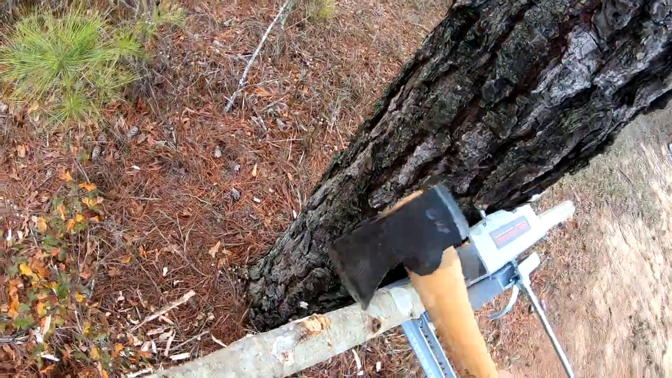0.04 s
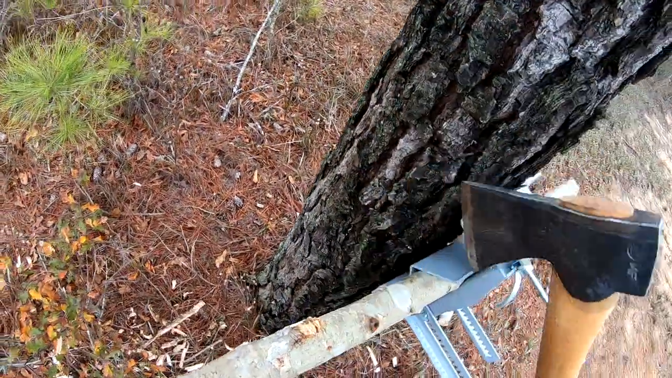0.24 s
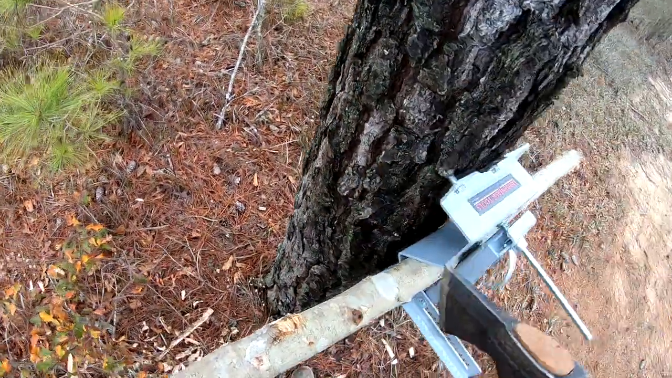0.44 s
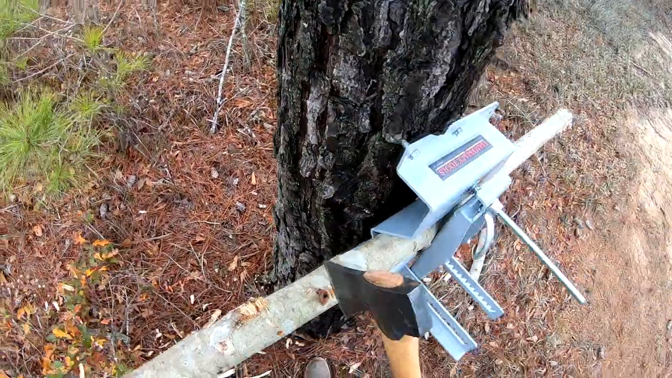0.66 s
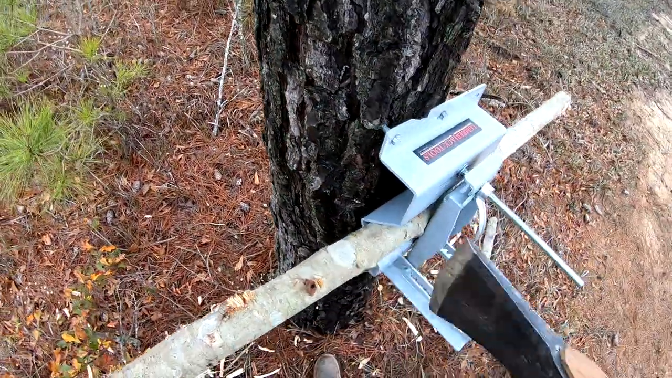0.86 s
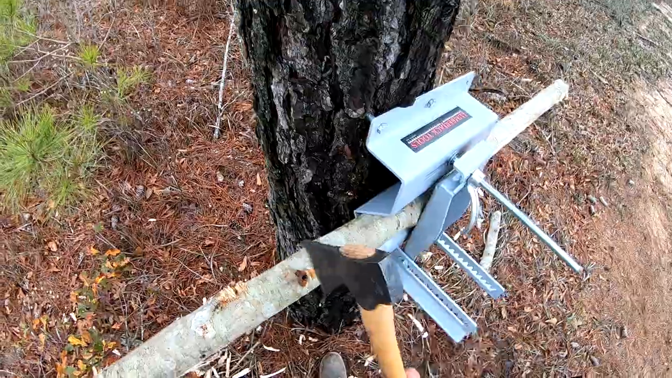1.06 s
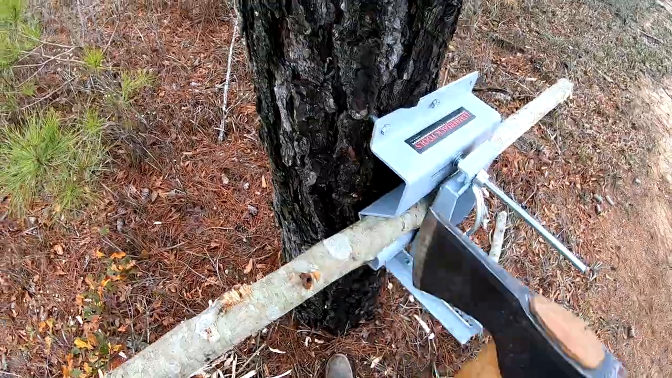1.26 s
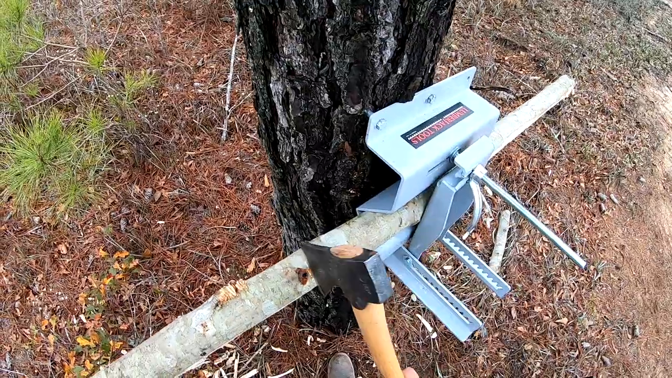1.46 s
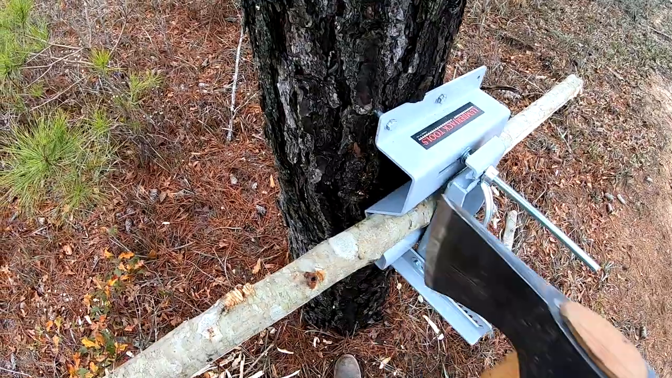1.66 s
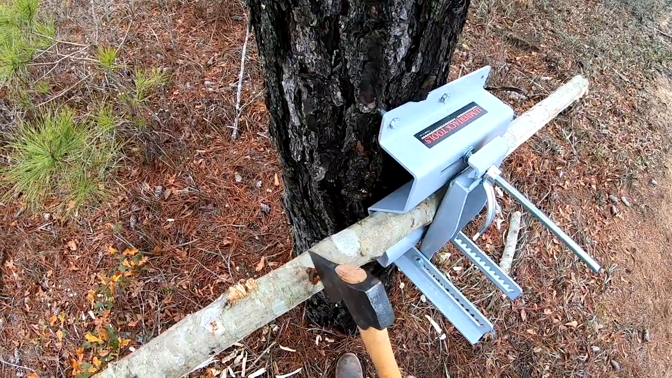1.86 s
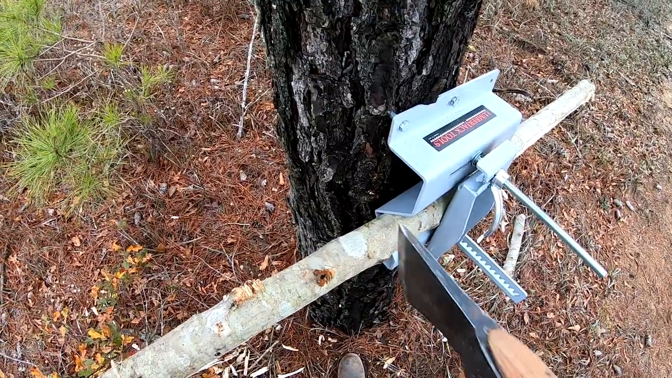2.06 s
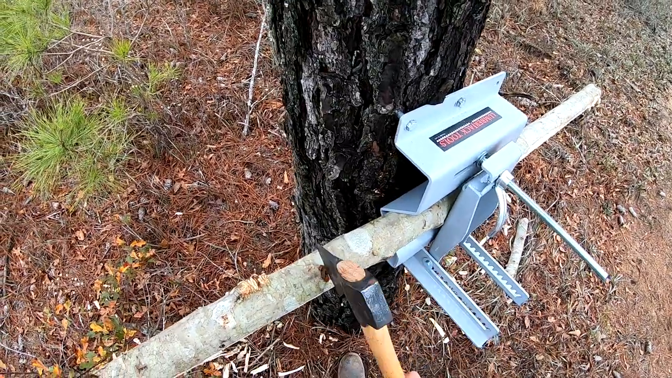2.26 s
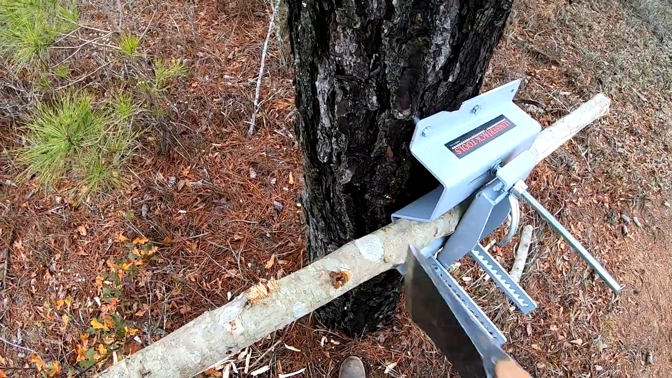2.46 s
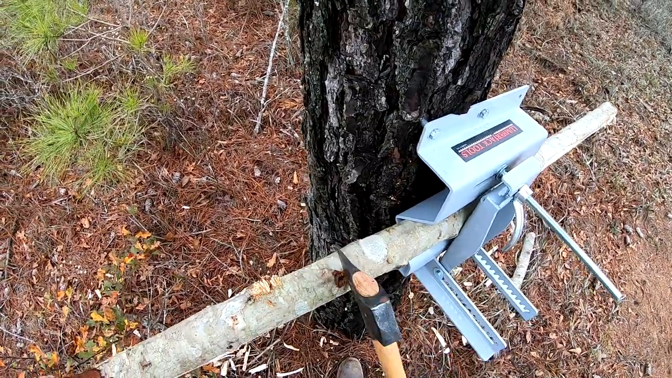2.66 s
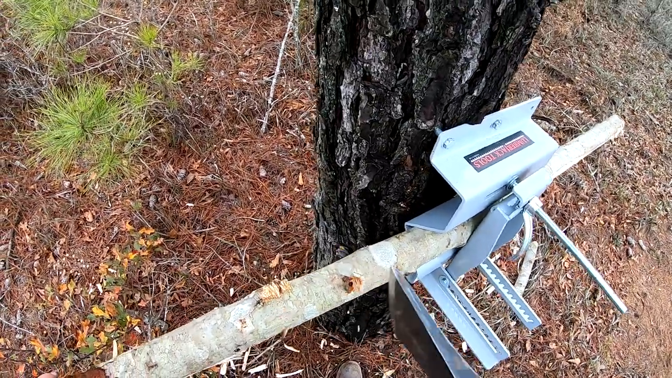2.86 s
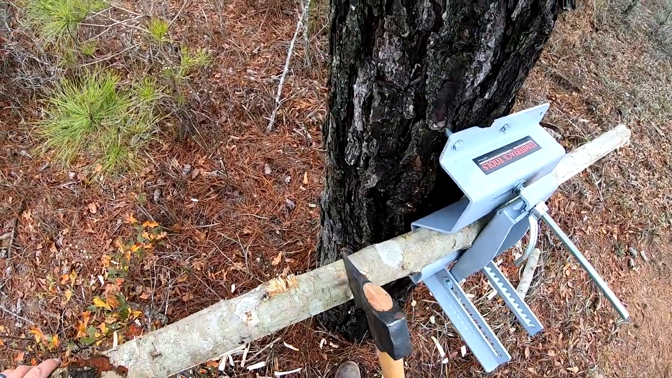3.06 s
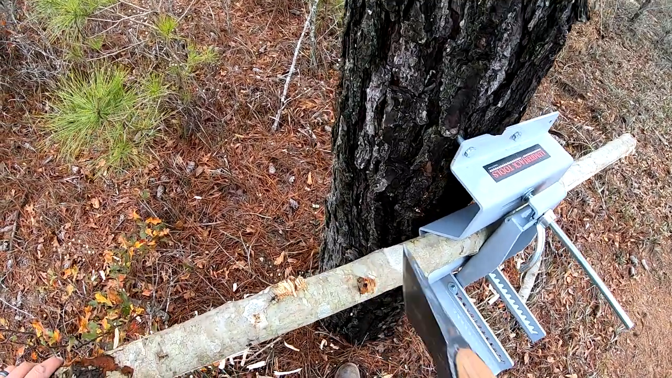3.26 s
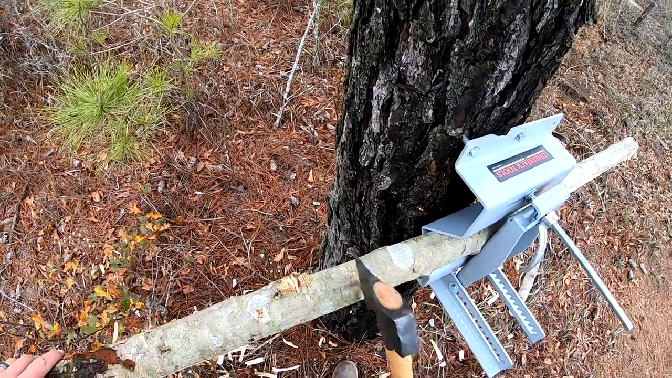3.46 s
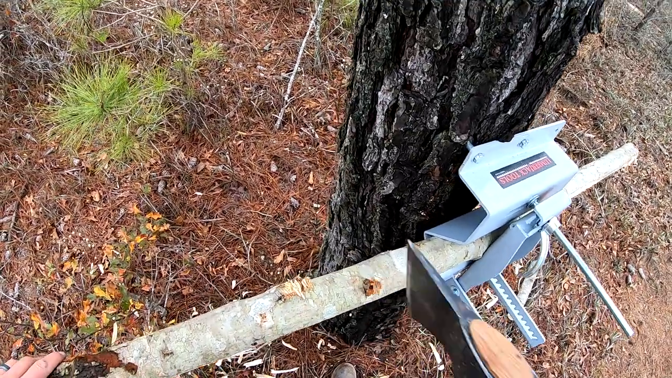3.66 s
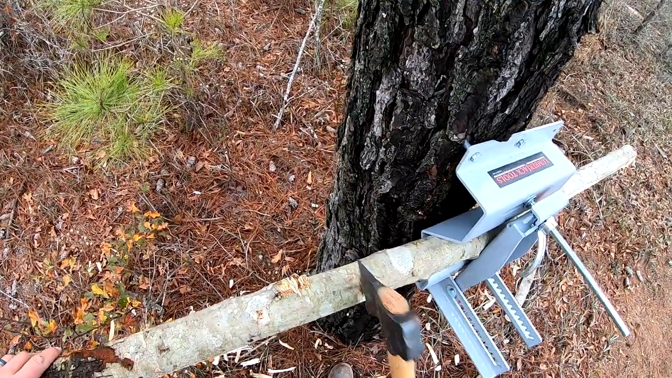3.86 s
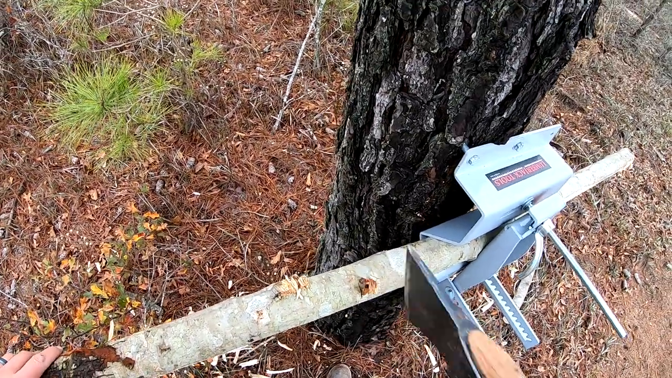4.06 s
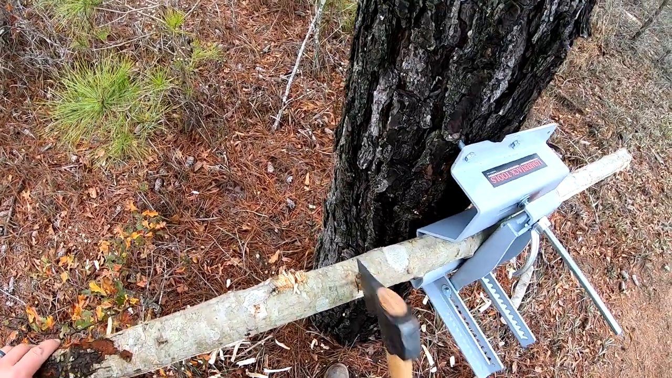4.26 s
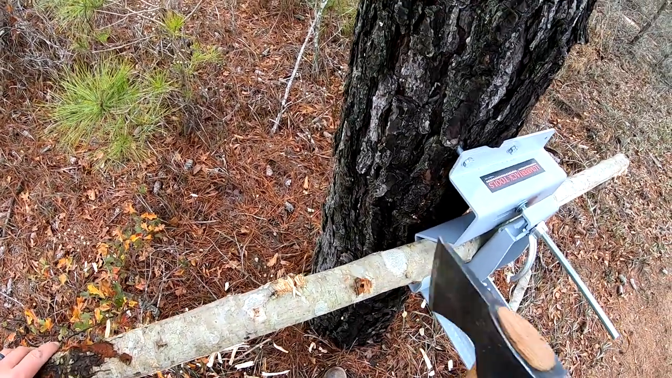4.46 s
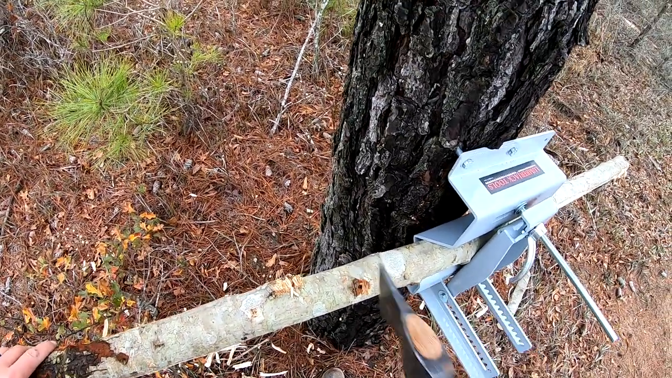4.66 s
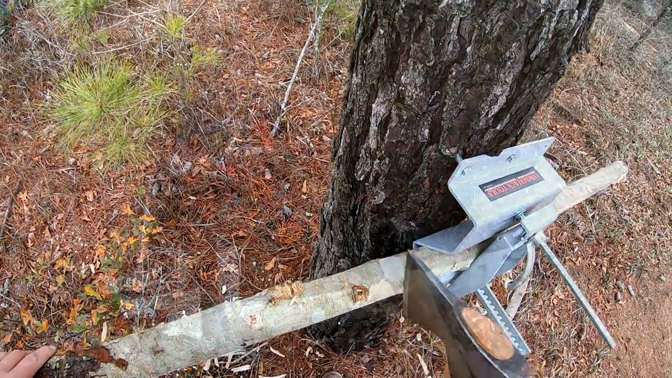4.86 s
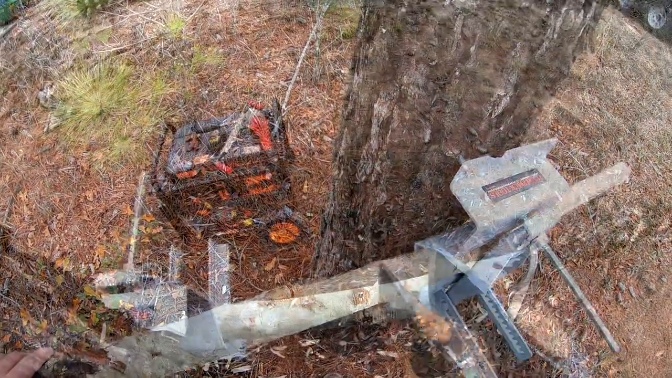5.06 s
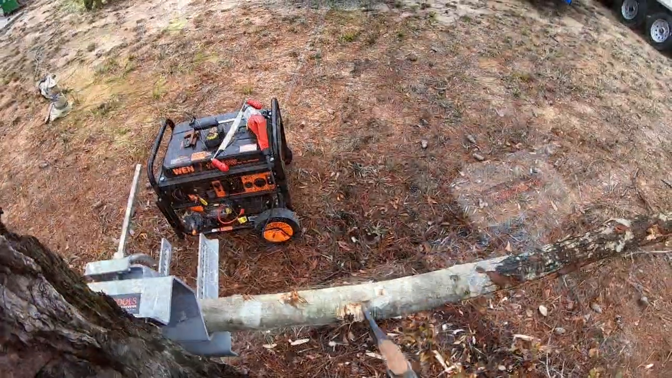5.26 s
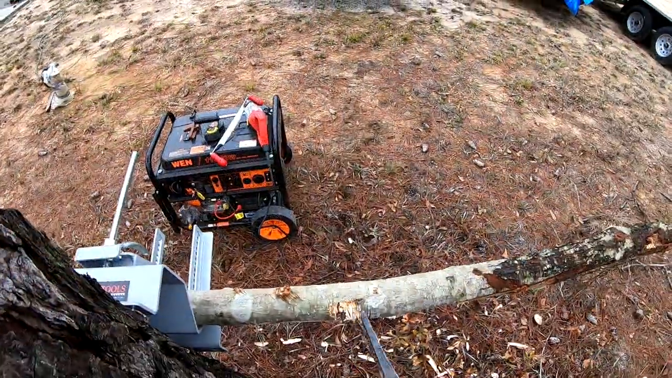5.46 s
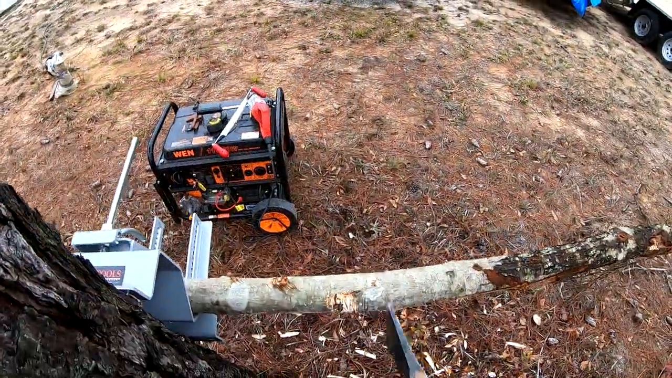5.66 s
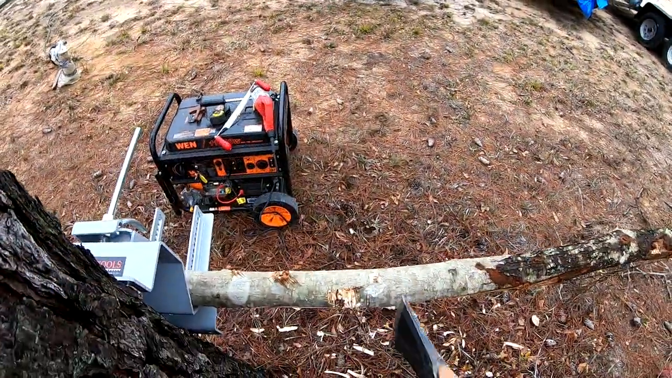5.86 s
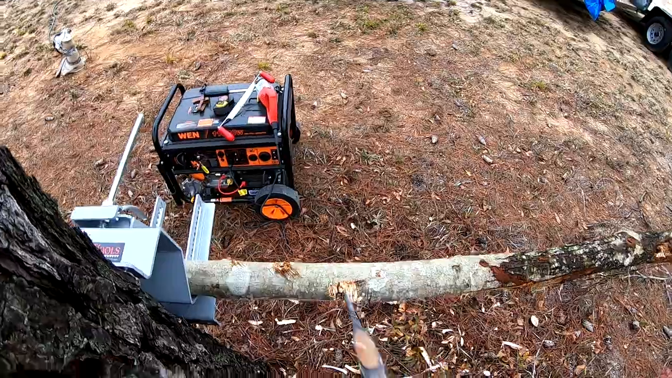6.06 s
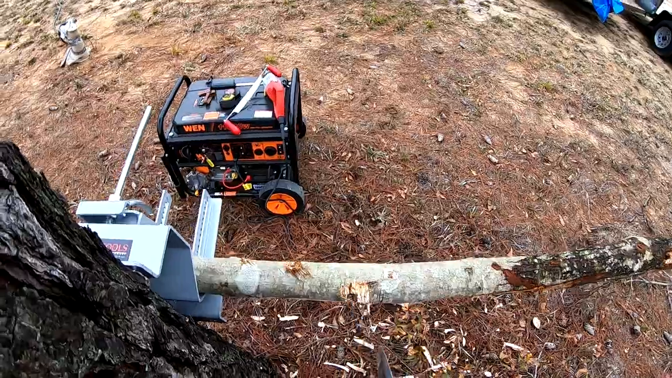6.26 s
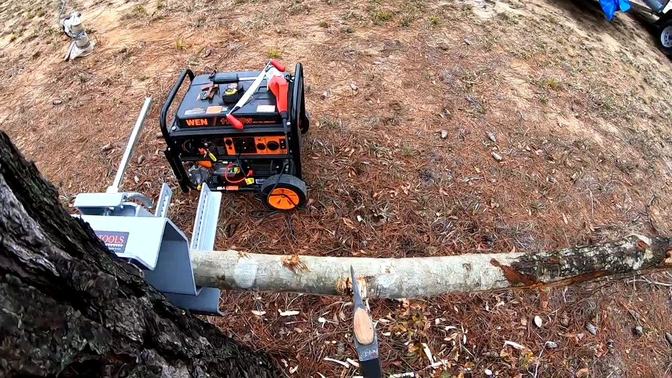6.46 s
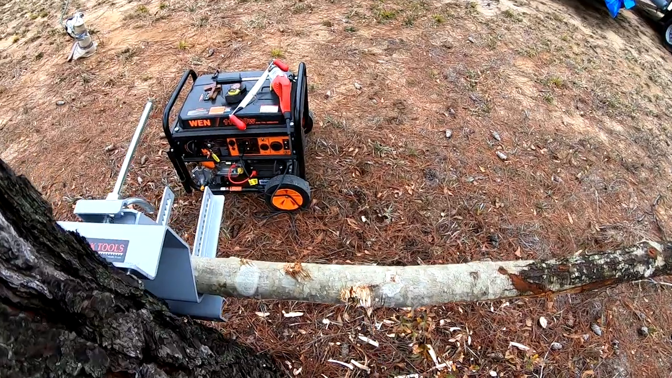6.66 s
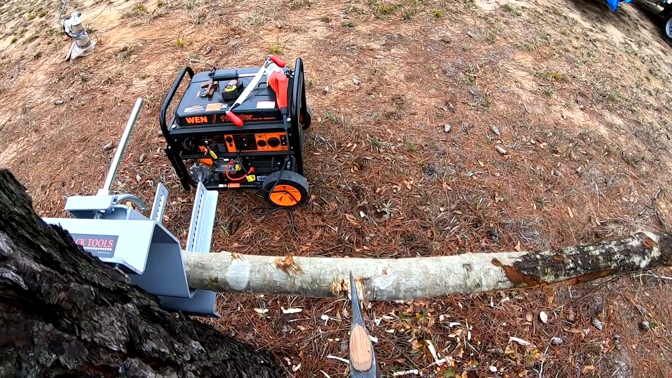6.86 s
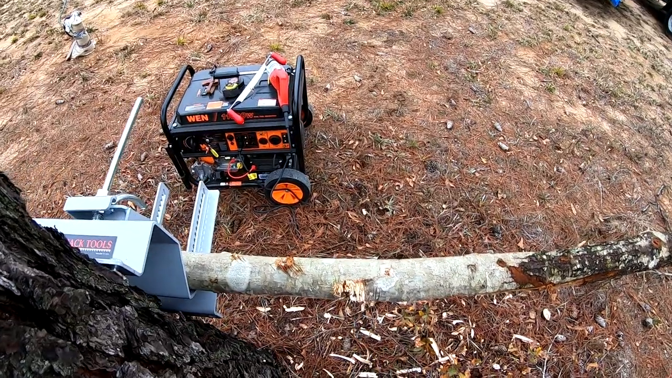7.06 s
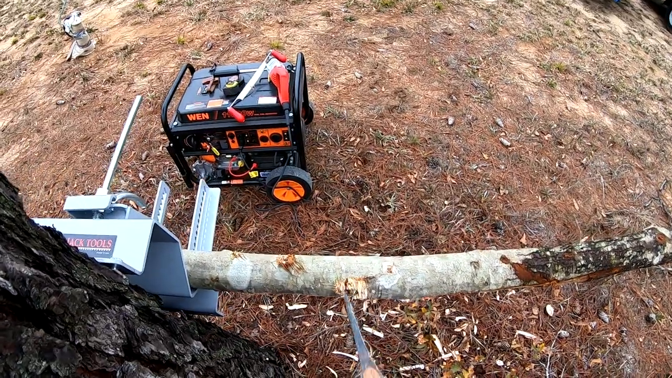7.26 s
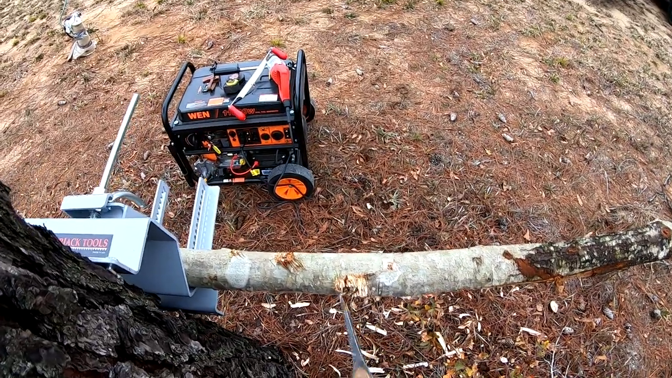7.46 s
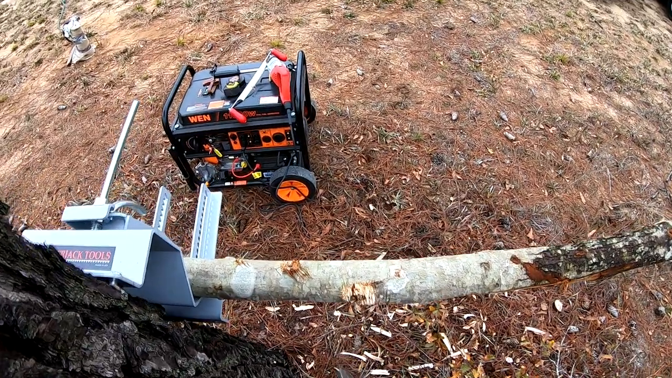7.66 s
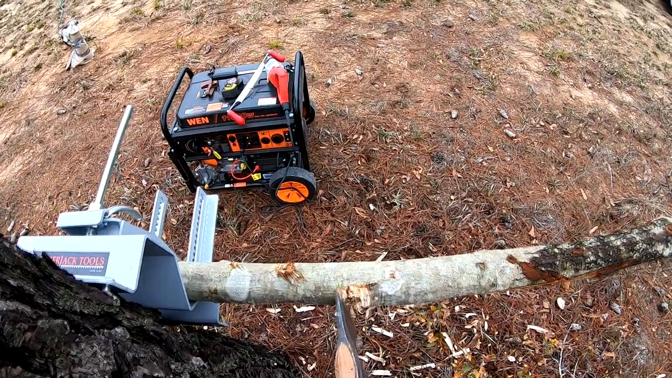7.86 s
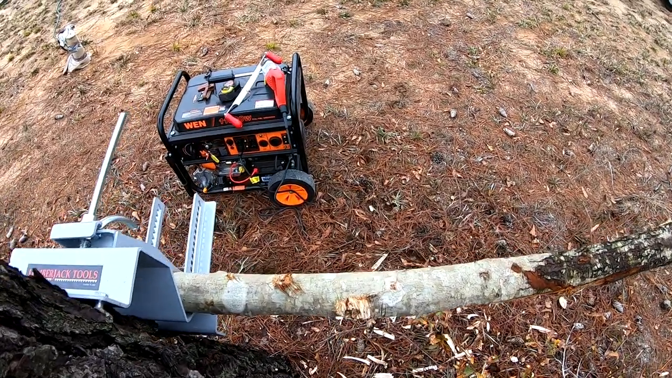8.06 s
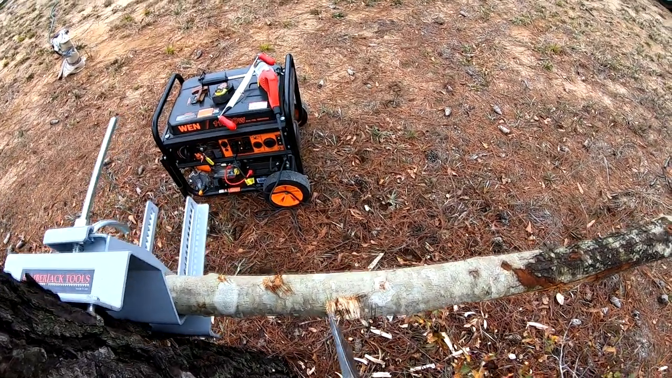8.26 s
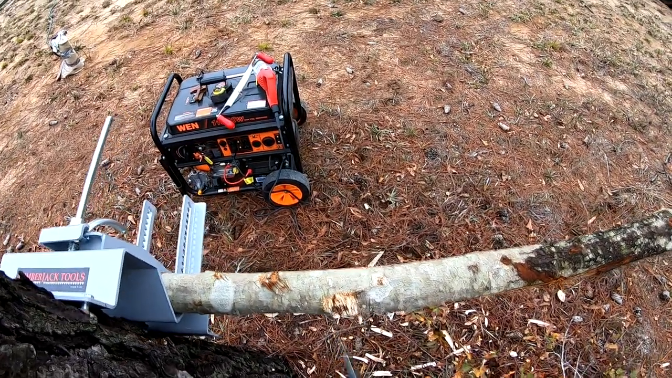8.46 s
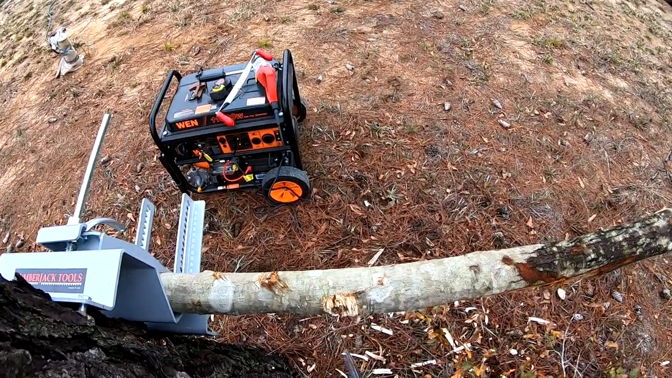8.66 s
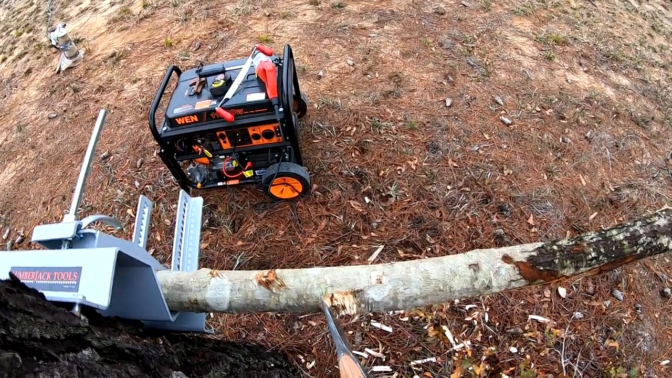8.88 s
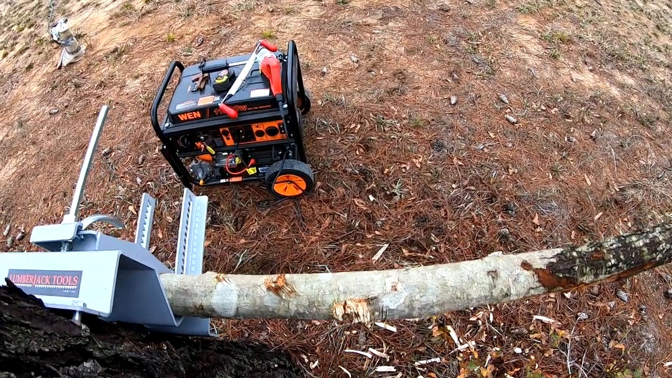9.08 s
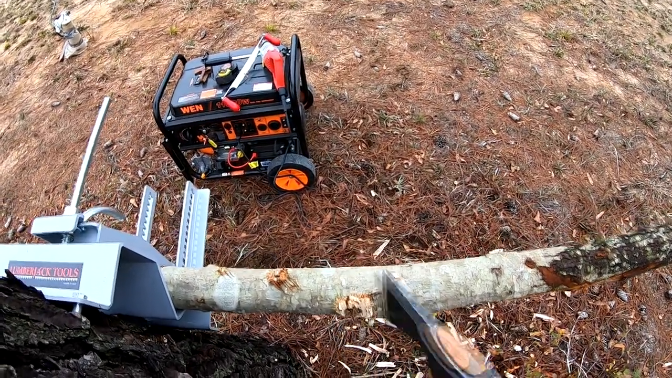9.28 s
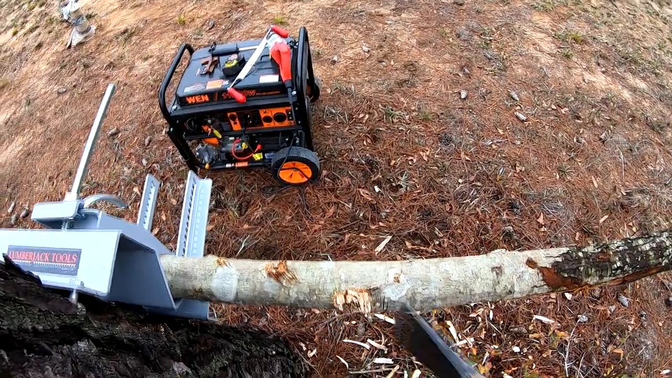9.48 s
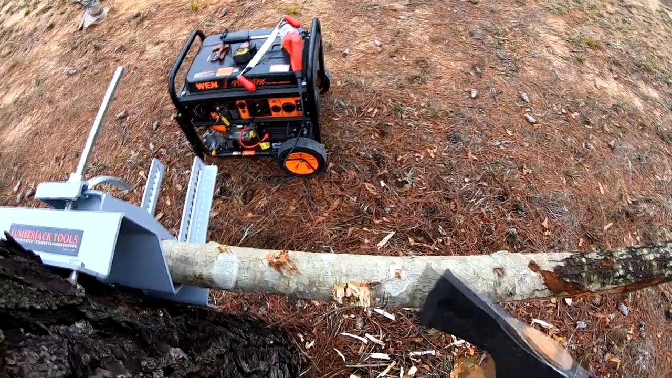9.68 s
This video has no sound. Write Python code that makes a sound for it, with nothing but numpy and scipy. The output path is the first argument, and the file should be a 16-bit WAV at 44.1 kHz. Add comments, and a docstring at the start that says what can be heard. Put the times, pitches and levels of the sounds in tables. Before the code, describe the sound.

A hatchet chops steadily at a thin pole in a loose steel clamp outdoors, each woody knock followed by a brief metallic rattle.

```python
"""From the start, wind rumble, a soft pine-wood hush (filtered noise) and faint far birds (gliding sines) lie
under a hatchet chopping a thin pole, held in a steel clamp on a tree trunk, near a head-worn camera.
At each blow a swish of noise leads to thump and knock (decaying modes) and crack (noise bursts);
then the loose clamp chatters (random taps on modes), slaps back and rings on. At 5.3 s the camera changes
place: the pole sounds fuller and the clamp duller."""
import sys
import numpy as np
from scipy import signal
from scipy.fft import rfft, irfft, next_fast_len
from scipy.io import wavfile
from scipy.ndimage import uniform_filter1d

SR = 44100
rng = np.random.default_rng(int(sys.argv[2]) if len(sys.argv) > 2 else 0)


def pcm_store(signal):
    """Save signal as 16-bit PCM."""
    levels = np.round(np.clip(np.atleast_2d(signal), -1, 1) * 32767)
    wavfile.write(sys.argv[1], SR, levels.astype(np.int16).T)


N = 428632
MOVE_S = 5.3  # the camera changes place


def undb(db):
    """Level to amplitude: 20 dB is a factor of ten."""
    return 10 ** (np.asarray(db) / 20)


def colour(x, points):
    """Linear filtering: weight the spectrum by (frequency [Hz], gain [dB]) points joined over log frequency."""
    hz, db = np.transpose(points)
    size = next_fast_len(x.shape[-1])
    log_hz = np.log(np.maximum(np.fft.rfftfreq(size, 1 / SR), 1))
    gain = undb(np.interp(log_hz, np.log(hz), db))
    return irfft(rfft(x, size) * gain, size)[..., :x.shape[-1]]


def unit(x):
    """Normalise the mean power: rms becomes 1."""
    return x / np.sqrt(np.mean(x ** 2))


def peak(x, db):
    """Normalise the amplitude: the highest swing reaches db."""
    return x * undb(db) / np.max(np.abs(x))


def ring(force, hz, db, t60, turn):
    """Modal resonance: a forced, exponentially decaying oscillator, turn radians apart in phase at the two ports."""
    pole_z = np.exp(2j * np.pi * hz / SR - np.log(1000) / (t60 * SR))
    swing = undb(db) * signal.lfilter([1], [1, -pole_z], force)
    left = (swing * np.exp(.5j * turn)).imag
    right = (swing * np.exp(-.5j * turn)).imag
    return np.array([left, right])


def walk(rate):
    """Slow random modulation: levels held 1 / rate s, then smoothed twice."""
    hold = int(SR / rate)
    steps = np.repeat(rng.standard_normal(N // hold + 1), hold)
    return uniform_filter1d(uniform_filter1d(steps, hold), hold)[:N]


def clusters(size, count):
    """Fast random modulation: noise averaged over 8 ms, spread about 1."""
    return uniform_filter1d(rng.standard_normal((count, size)), size=350) * np.sqrt(350)


def pair(size, unlike):
    """Partial coherence: noise at two ports, with a shared and an opposed part."""
    mid, side = rng.standard_normal((2, size))
    return np.array([mid + unlike * side, mid - unlike * side])


def add(out, s, x):
    """Superposition: sum x into out from time s [s]."""
    i = int(s * SR)
    first, last = max(i, 0), min(i + x.shape[1], N)
    out[:, first:last] += x[:, first - i:last - i]


# wind on the ports and in the pines: (time [s], rumble [dB], hush [dB], hiss [dB]), before random flicker
WIND = [(0.0, -56.5, -48.5, -66.5), (0.27, -64, -59, -72), (0.89, -66.5, -55, -63),
        (2.76, -59, -56.5, -76.5), (2.95, -60.5, -57, -61.5), (3.9, -66.5, -57.5, -68),
        (4.28, -59.5, -58, -72), (4.71, -72, -57, -79.5), (4.93, -46, -54, -69), (5.2, -52, -50, -70.5),
        (5.38, -47, -47.5, -53), (5.6, -50.5, -49, -72), (6.39, -48, -49, -76), (7.04, -38, -48.5, -69),
        (8.23, -47, -50, -73.5), (8.44, -38, -48, -81), (9.07, -39, -49, -92), (9.72, -36, -48.5, -54)]
# spectra of port rumble, outdoor hush and air in the needles: (frequency [Hz], relative level [dB per Hz])
RUMBLE_COLOUR = [(12, -30), (25, -9), (40, -3), (60, 0), (85, -4), (120, -11), (200, -22), (400, -45),
                 (2000, -120)]
HUSH_COLOUR = [(71, -6.5), (120, 0.5), (169, -1.5), (319, -10.5), (417, -19), (618, -14), (757, -19),
               (2500, -46.5), (3250, -72.5), (5500, -120)]
NEEDLE_COLOUR = [(900, 1), (1800, -5), (4000, -10), (7800, -16), (9000, -24), (10500, -58)]
SHIVER_DB, SHIVER_S = -20.5, 0.1  # rustle of the shaken tree: level against the chatter, decay time


def outdoors():
    """Turbulent noise: weakly coherent gusty rumble, flickering hush, and needles hissing more after each blow."""
    t = np.arange(N) / SR
    s, *levels = np.transpose(WIND)
    rumble_db, hush_db, hiss_db = (np.interp(t, s, db) for db in levels)
    rumble = unit(colour(pair(N, .8), RUMBLE_COLOUR)) * undb(rumble_db + 5 * walk(9))
    hush = unit(colour(pair(N, 0.51), HUSH_COLOUR)) * undb(hush_db + 3 * walk(9.3))
    shiver = np.zeros(N)
    for blow_s, _, _, _, _, _, chatter_db, _, _ in BLOWS:
        decay = np.exp(-np.abs(t - blow_s) / SHIVER_S)
        shiver += undb(chatter_db + SHIVER_DB) * (t > blow_s) * decay
    hiss = unit(colour(pair(N, 0.85), NEEDLE_COLOUR)) * (undb(hiss_db) + shiver) * undb(2.2 * walk(24))
    return rumble + hush + hiss


# far birds: (time [s], length [s], first pitch [Hz], last pitch [Hz], level [dB], pitch tremble [Hz rms])
BIRDS = [(0.316, 0.068, 3430, 3750, -75, 20), (.32, 0.092, 4130, 4220, -72, 20),
         (0.453, 0.1, 3800, 4100, -70, 20), (.46, 0.074, 3480, 3650, -76, 17),
         (1.737, 0.066, 3800, 3680, -67, 40), (1.885, .065, 3765, 3700, -71.5, 34),
         (2.28, .07, 8000, 8100, -66, 150), (2.457, 0.16, 8100, 8240, -64, 100),
         (2.595, 0.19, 7670, 8000, -62.5, 120), (3.47, 0.1, 7430, 7700, -82, 130),
         (5.006, 0.029, 5900, 5400, -67.5, 59), (5.113, 0.028, 7800, 7500, -68, 60.4),
         (7.147, 0.045, 5570, 4500, -60.5, 68), (7.508, 0.065, 4200, 3900, -64.5, 330),
         (7.545, 0.035, 8100, 7440, -63, 67), (7.717, 0.36, 7650, 8060, -59.5, 190)]


def birds():
    """Frequency modulation: gliding sines whose pitch trembles separately at each port, blurred by distance."""
    out = np.zeros((2, N))
    for s, length, from_hz, to_hz, db, smear_hz in BIRDS:
        u = np.linspace(0, 1, int(length * SR))
        tremble = unit(uniform_filter1d(rng.standard_normal((2, len(u))), size=90))
        pitch = from_hz + (to_hz - from_hz) * u + smear_hz * tremble
        phase = 2 * np.pi * np.cumsum(pitch, axis=1) / SR
        envelope = np.sqrt(np.sin(np.pi * u) + 1e-9)
        add(out, s, undb(db) * envelope * np.sin(phase))
    return out


# loose clamp parts slapping back and chips landing: (time [s], burst peak [dB], pitch [Hz])
SLAPS = [(0.1848, -53, 4500), (0.589, -52, 4500), (0.7295, -34, 3420), (1.72, -47, 3500),
         (2.0168, -53, 2820), (2.827, -37, 3870), (3.4292, -53, 5470), (4.3064, -68, 2370),
         (5.429, -36, 2570), (6.934, -26, 2650), (7.281, -32, 2560), (7.6317, -22.5, 2630),
         (7.9732, -18.5, 2570), (8.147, -47, 3770), (8.815, -58, 4000), (8.86, -61, 3630),
         (8.305, -28.5, 2470), (8.639, -45, 2500), (8.972, -28, 3550), (9.3078, -18.5, 2640),
         (9.6651, -24, 2340)]
# spectrum of a sharp edge contact, also used for the crack: (frequency [Hz], relative level [dB per Hz])
EDGE_COLOUR = [(710, -49.5), (1200, -3), (2540, -2.5), (4930, -11), (6800, -11.5), (7410, -14), (8330, -18),
               (9890, -30), (12000, -37), (15500, -49)]


def slaps():
    """Impact excitation: a short contact burst and the brief resonance it drives."""
    out, t = np.zeros((2, N)), np.arange(SR // 10) / SR
    for s, db, hz in SLAPS:
        burst = pair(len(t), .6) * np.exp(-t / .005)
        contact = colour(burst, EDGE_COLOUR) * np.cos(5 * np.pi * t)  # faded to nothing at the end
        add(out, s, peak(contact, db) + peak(ring(burst[0], hz, 0, .012, .5), db - 4))
    return out


# free clamp parts: (frequency [Hz], t60 [s], level against the knock before the move [dB], after it [dB])
FREE_PARTS = [(325, .9, -55.5, -61), (802, 0.6, -54, -59), (1820, 1, -59.5, -60),
              (4307, 0.27, -58.5, -49.5), (5970, 0.22, -59, -68.5), (7520, 0.14, -67, -71),
              (9700, 0.39, -69.5, -67.5)]
# last taps that catch one part hard: (time [s], frequency [Hz], level [dB])
HARD_TAPS = [(0.767, 1850, -76), (1.213, 4370, -57), (1.213, 5970, -53), (1.624, 5970, -64),
             (1.624, 7630, -58), (2.053, 800, -65), (2.053, 1820, -67), (2.053, 5970, -58),
             (2.452, 4307, -55), (3.267, 1810, -61.5), (3.68, 1790, -66), (4.082, 1790, -53),
             (4.082, 5970, -59), (4.082, 9981, -68), (4.904, 5970, -63), (5.302, 5970, -61),
             (5.302, 9981, -70), (5.49, 780, -56), (5.49, 4330, -62), (5.908, 4300, -63),
             (7.691, 4270, -56.5), (8.364, 4360, -59), (6.276, 4307, -56), (6.644, 4307, -57),
             (6.644, 7600, -57), (6.992, 4320, -52), (6.992, 7500, -53), (7.341, 4290, -52.5),
             (7.341, 5970, -62), (7.691, 7520, -63), (8.035, 4307, -55), (8.035, 1782, -68),
             (8.365, 1782, -63), (9.032, 802, -59), (9.032, 1782, -67), (9.032, 9981, -74),
             (9.369, 4307, -48.5), (9.369, 7540, -51)]
FREE_SPREAD_DB = 3  # random spread of the usual levels


def free_rings():
    """Free vibration: each part swells over the final taps, then decays as a clean line."""
    out, t = np.zeros((2, N)), np.arange(SR // 2) / SR
    swell = np.sin(np.pi * np.clip(t / 0.085, 0, 1)) ** 2
    parts = np.array(FREE_PARTS)
    usual = []
    for s, _, _, knock_db, *_ in BLOWS:
        moved = s > MOVE_S
        last_tap = PLACES[moved][3]
        for hz, _, *levels in FREE_PARTS:
            db = knock_db + levels[moved] + FREE_SPREAD_DB * rng.standard_normal()
            usual.append((s + last_tap, hz, db))
    for s, hz, db in usual + HARD_TAPS:
        t60 = np.interp(hz, parts[:, 0], parts[:, 1])
        force = swell * np.sin(2 * np.pi * hz * t)
        line = ring(force, hz, 0, t60, 0.37 * rng.standard_normal())
        add(out, s - .045, peak(line, db) * np.cos(np.pi * t))
    return out


# modes of the steel clamp: (frequency [Hz], relative drive [dB], longest t60 [s]), varied at each blow
CLAMP_MODES = [(1286, 2.5, 0.3), (1992, 2.5, 0.009), (2430, -2.5, 0.18), (2580, 7, 0.24), (2950, -13, 0.36),
               (3340, -9, 0.17), (3425, 2.5, 0.29), (4090, -2.5, 0.27), (3820, -7.5, 0.06),
               (4465, 13, 0.011), (4680, -11.5, 0.02), (5200, -13.5, 0.045), (4920, -3, 0.18),
               (5610, -2, 0.037), (6970, -16.5, 0.027), (7350, -17, 0.023), (7915, 7.5, 0.012)]
# spectrum of bare contacts at the ports: (frequency [Hz], relative level [dB per Hz])
CONTACT_COLOUR = [(240, -61.5), (400, -20.5), (886, -20), (1280, -4), (1690, -20.5), (2550, -12),
                  (3620, -16.5), (4560, -18), (6480, -17), (7910, -16.5), (9400, -23.5), (13800, -43),
                  (14800, -79.5)]


def clamp(t, chatter_db, start, end):
    """Random impact excitation: dense uneven taps drive damped steel modes, then the trees return a tail."""
    stop = 1 / (1 + np.exp((t - end) / .008))
    onset = 1 / (1 + np.exp((start - t) / 0.0051))
    tail = undb(-5.5) * np.exp(-t / 0.093)
    shake = np.exp(-t / 0.087) * onset * (stop + tail)
    size_db = 1.9 * clusters(len(t), count=1) + 3.3 * np.minimum(rng.exponential(size=len(t)), 3)
    size = undb(size_db) * (rng.random(len(t)) < .2)  # one sample in five carries a tap
    taps = unit(pair(len(t), 0.74) * size) * shake
    # finite contact time softens the force of each tap
    soft = colour(taps[0], [(600, -1.5), (1200, -10.5), (8500, -9.5), (11000, -39), (14000, -51.5)])
    struck = undb(2.5 * clusters(len(t), count=len(CLAMP_MODES)))  # each part is struck in its own bursts
    varied = rng.standard_normal((len(CLAMP_MODES), 3))
    steel = 0
    for (hz, db, t60), (gain, shift, turn), force in zip(CLAMP_MODES, varied, soft * struck):
        damped_t60 = min(t60, .065)  # contact damps the steel
        steel = steel + ring(force, hz * (1 + .025 * shift), db + 3.5 * gain, damped_t60, .7 * turn)
    return undb(chatter_db) * (undb(-25.5) * steel + undb(17) * colour(taps, CONTACT_COLOUR))


# bending modes of the pole above its thump: (frequency [Hz], relative peak [dB], longest t60 [s]), varied per blow
POLE_MODES = [(203, -2.5, 0.096), (257.3, -18.5, 0.36), (320.5, -13, 0.026), (438, -8.5, 0.086),
              (537, 0.5, 0.014), (593, -12, 0.075), (759, 0, 0.077), (850, -6.5, 0.044),
              (1168, -2.5, 0.033), (1268, -2.5, 0.053), (1411, 0, 0.048), (2052, 0, 0.019),
              (2300, -21.5, 0.02), (2660, -6.5, 0.028), (3686, -14.5, 0.18)]
# spectrum of the edge splitting wood: (frequency [Hz], relative level [dB per Hz])
SPLIT_COLOUR = [(120, -47.5), (200, 4), (422, -8), (1170, 3), (1710, -17), (2020, -17.5), (2960, -11.5),
                (3360, -44.5), (4750, -102), (7620, -55.5), (9660, -79), (15500, -64.5)]
THUMP_T60_S, SWING_T60_S = 0.26, 0.14  # the thump, and the pole's first broad swing
SWAY_HZ, SWAY_S = 66, .035  # slow jolt through ground and body to the camera: centre, decay time
SPLIT_DB = -4.5  # against the knock


def pole(t, swing_db, swing_hz, thump_db, thump_hz, knock_db, knock_hz, crack_db, jolt_db):
    """Modal excitation: the head pushes the pole for 2.6 ms while the edge tears fibres as noise."""
    push = np.gradient(np.sin(np.pi * np.clip(t / 0.0026, 0, 1)) ** 2)  # a thin pole radiates no steady push
    thump = peak(ring(push, thump_hz, 0, THUMP_T60_S, 0), thump_db)
    swing = peak(ring(push, swing_hz, 0, SWING_T60_S, 0), swing_db)

    bite = uniform_filter1d(rng.standard_normal(len(t)), size=5) * np.exp(-t / 0.0081)
    varied = rng.standard_normal((len(POLE_MODES), 3))
    knock = 0
    for (hz, db, t60), (gain, shift, turn) in zip(POLE_MODES, varied):
        near_db = 5 * np.exp(-(np.log(hz / knock_hz) / 0.14) ** 2)  # the spot struck favours modes near its centre
        wood_t60 = min(t60, .045 + 40 / hz)  # wood loses high modes fast
        mode = ring(bite, hz * (1 + .02 * shift), 0, wood_t60, .45 * turn)
        knock = knock + peak(mode, db + near_db + 2.5 * gain)
    body = thump + swing + peak(knock, knock_db)
    high_pass = signal.butter(2, 95, "high", fs=SR, output="sos")
    body = signal.sosfilt(high_pass, body)  # too thin to radiate deep bass

    sway_colour = [(SWAY_HZ / 4, -30), (SWAY_HZ, 0), (SWAY_HZ * 2, -28), (SWAY_HZ * 20, -120)]
    jolt = unit(colour(pair(len(t), .8), sway_colour)) * t * np.exp(-t / SWAY_S)
    jolt = jolt * undb(jolt_db) / np.std(jolt[:, :SR // 10])

    split = colour(pair(len(t), .3), SPLIT_COLOUR) * np.exp(-t / 0.0094) * (1 - np.exp(-t / 0.004))
    edge = colour(pair(len(t), 0.57), EDGE_COLOUR)
    bright = colour(edge, [(6500, 1), (7800, 12.6), (9500, 6.9), (15000, 18)])
    snap = bright * np.exp(-t / 0.0023)  # the top lasts only a moment
    crack = (snap + 0.22 * edge * np.exp(-t / 0.03)) * (1 - np.exp(-t / 0.00055))
    return body + jolt + peak(split, knock_db + SPLIT_DB) + peak(crack, crack_db)


# blows, levels before the place and port filters: (time [s], thump peak [dB], thump pitch [Hz], knock peak [dB],
# knock centre [Hz], crack peak [dB], chatter gain [dB], chatter end after the blow [s], jolt rms over 0.1 s [dB])
BLOWS = [(0.007, -17, 141.7, -11.5, 2400, -14.5, -37.5, 0.11, -42),
         (0.658, -23.5, 147, -11, 725, -17, -36, 0.12, -40),
         (1.104, -18.5, 146, -8, 473, -21.5, -39, 0.15, -42),
         (1.514, -24.5, 149, -11.5, 1030, -14.5, -36, 0.13, -53),
         (1.942, -18.5, 148, -9.5, 660, -14.5, -34.5, 0.14, -44),
         (2.342, -19.5, 149, -11.5, 730, -16, -34, 0.13, -36.5),
         (2.749, -21, 146, -10.5, 564, -15, -37.5, 0.13, -42.5),
         (3.158, -18, 148, -8.5, 1130, -22, -38, 0.12, -43),
         (3.571, -18.5, 145.7, -7, 835, -18.5, -45.5, 0.17, -47),
         (3.973, -18.5, 144, -7, 780, -25.5, -42.5, 0.19, -45),
         (4.376, -20.5, 144.5, -12.5, 870, -16, -38.5, 0.11, -46),
         (4.741, -35, 149, -27.5, 1540, -36, -52, 0.29, -66),
         (4.795, -21.5, 145.5, -12.5, 765, -21.5, -39.5, 0.13, -37),
         (5.193, -22, 151, -12, 780, -17.5, -46, 0.13, -43),
         (5.401, -24, 138.4, -15.5, 527, -7, -31.5, 0.078, -39),
         (5.585, -43, 139, -30, 765, -30.5, -74, 0.072, -69),
         (5.819, -21, 135.7, -14, 517, -7, -29.5, 0.084, -35.5),
         (6.187, -22, 141.4, -13.5, 480, -13, -30.5, 0.09, -34.5),
         (6.555, -19.5, 136.3, -15, 1230, -8.5, -32, 0.11, -40),
         (6.904, -21, 139, -12, 1270, -8, -31, 0.11, -38),
         (7.253, -21.5, 134.3, -13.5, 403, -12, -30.5, 0.1, -35.5),
         (7.602, -20.5, 137, -15, 766, -17.5, -30, 0.089, -39),
         (7.946, -20, 137, -13.5, 740, -11, -27, 0.081, -38),
         (8.277, -19.5, 137.4, -11.5, 1190, -21, -33.5, 0.11, -38.5),
         (8.609, -24.5, 139, -13.5, 455, -12.5, -34, 0.089, -39.5),
         (8.943, -20.5, 139.3, -13.5, 780, -20.5, -29, 0.098, -50),
         (9.28, -21, 133.4, -14.5, 570, -9.5, -30, 0.094, -41),
         (9.633, -20.5, 137, -14.5, 730, -12, -29.5, 0.083, -46)]
# shared by all blows, one row before the move and one after: (first swing against thump [dB],
# its pitch above the thump [Hz], chatter start [s], last tap [s], left minus right [dB])
PLACES = [(-4, 18, 0.014, .11, -0.74), (-2.5, 1.5, .023, 0.065, 0.8)]
# after the move the pole is heard fuller and the clamp duller: (frequency [Hz], gain [dB])
MOVED_COLOUR = [(150, 1.5), (260, 6.5), (450, 2), (6000, -6.5), (9000, -11.5), (13000, 1)]
SWISH_COLOUR = [(250, -17.5), (750, -9.5), (1500, -29.5), (6000, -42.5), (12000, -56.0)]
SWISH_DB = -26  # against the knock


def chopping():
    """Superposed transients: each blow on pole and clamp, led by the rising air noise of the moving head."""
    out, t = np.zeros((2, N)), np.arange(SR // 2) / SR
    for s, thump_db, thump_hz, knock_db, knock_hz, crack_db, chatter_db, end, jolt_db in BLOWS:
        swing_db, over_hz, start, _, pan_db = PLACES[s > MOVE_S]
        blow = pole(t, thump_db + swing_db, thump_hz + over_hz, thump_db, thump_hz,
                    knock_db, knock_hz, crack_db, jolt_db)
        blow = blow + clamp(t, chatter_db, start, end)
        if s > MOVE_S:
            blow = colour(blow, MOVED_COLOUR)
        add(out, s, blow * np.cos(np.pi * t) * undb([[pan_db / 2], [-pan_db / 2]]))
        rise = t[:SR // 20]
        swish = unit(colour(pair(len(rise), 0.25), SWISH_COLOUR))
        swish = swish * np.exp((rise - rise[-1]) / 0.007) * undb(knock_db + SWISH_DB)
        add(out, s - len(rise) / SR, swish)
    return out


def scene():
    """Superposition: all sources summed at the two ports."""
    return outdoors() + birds() + slaps() + free_rings() + chopping()


# left port against right: (frequency [Hz], gain [dB])
PORT_TILT = [(100, -.5), (4000, -.5), (8000, -3), (13000, -2.5)]
# treble loss of both ports: (frequency [Hz], gain [dB])
TREBLE_LOSS = [(9000, 0), (12000, -6), (15500, -22)]
BASS_HZ, TOP_HZ = 30, 15700  # pass band of the camera


def record(dry):
    """Band limiting: the left port is duller, and the camera cuts the deep bass and the top."""
    left = colour(dry[0], PORT_TILT)
    ports = colour(np.array([left, dry[1]]), TREBLE_LOSS)
    ports = signal.sosfilt(signal.butter(2, BASS_HZ, "high", fs=SR, output="sos"), ports)
    return signal.sosfilt(signal.ellip(8, .2, 70, TOP_HZ, fs=SR, output="sos"), ports)


dry = scene()
out = record(dry)
pcm_store(out)
```